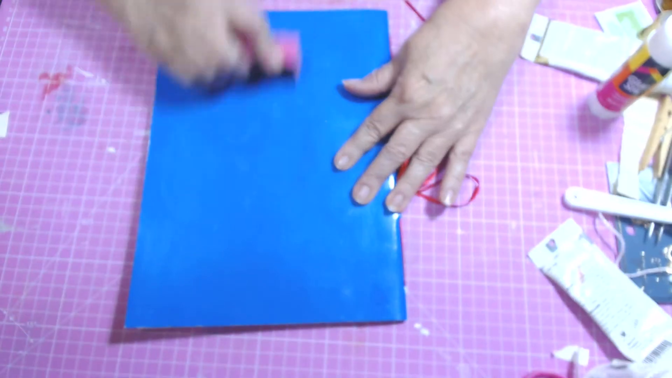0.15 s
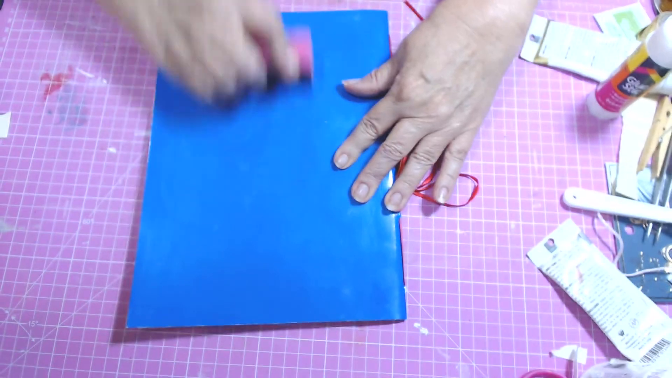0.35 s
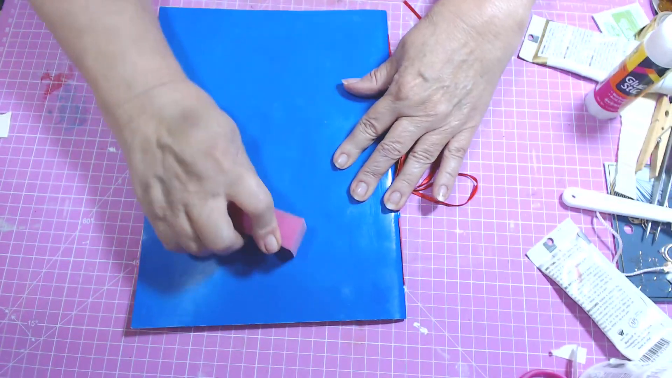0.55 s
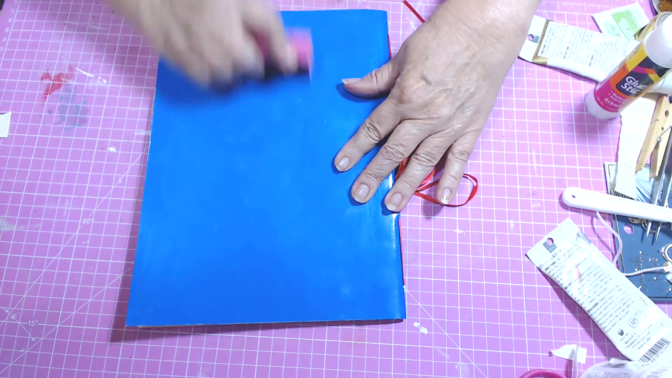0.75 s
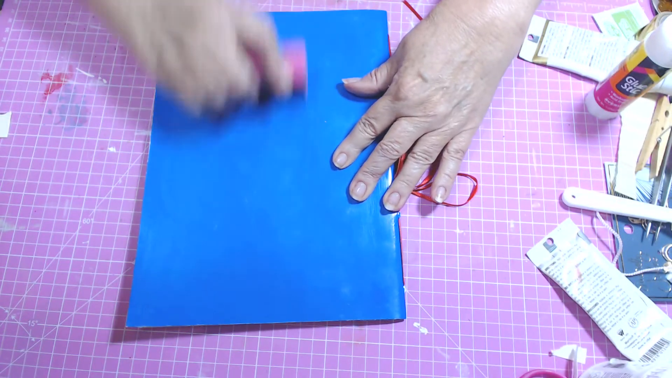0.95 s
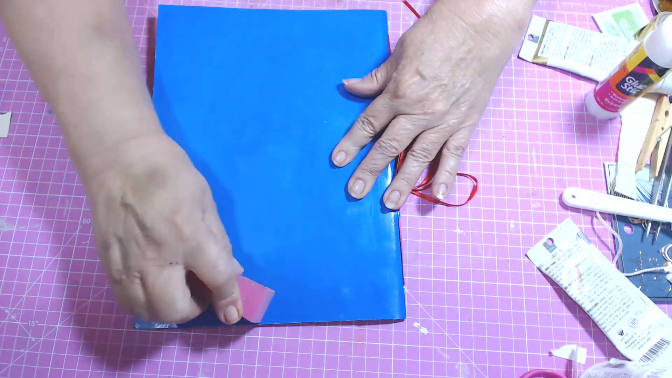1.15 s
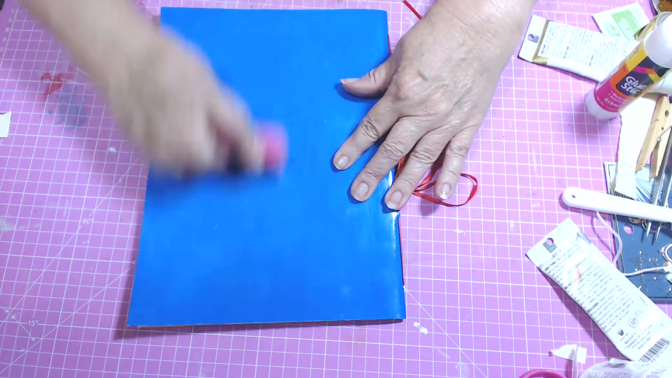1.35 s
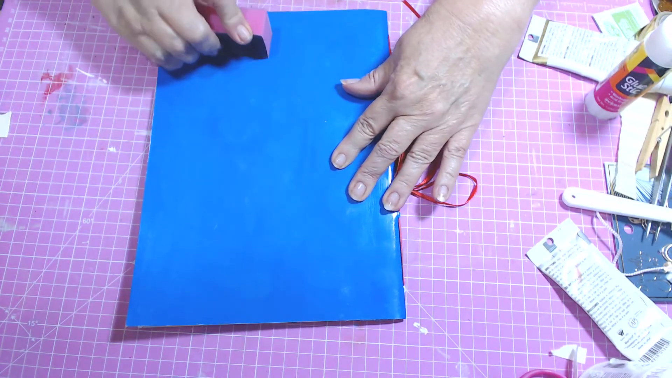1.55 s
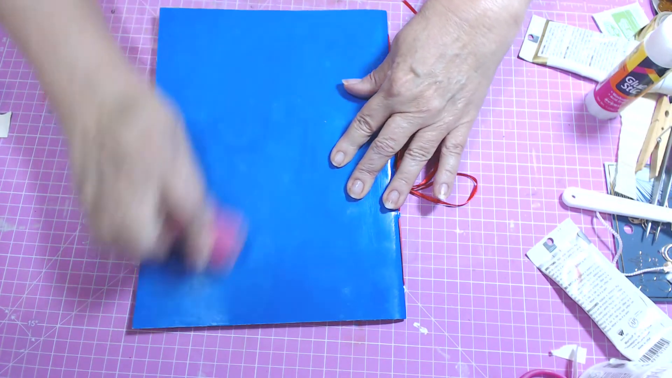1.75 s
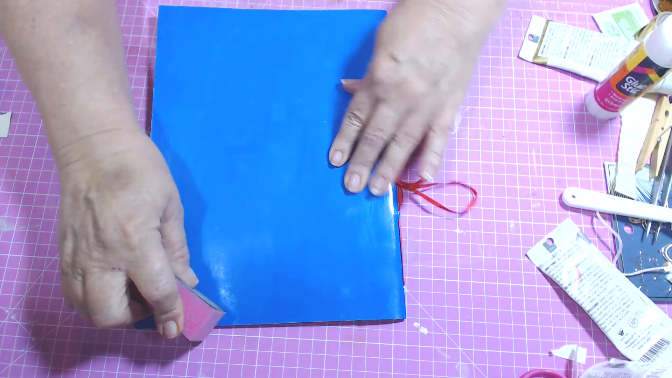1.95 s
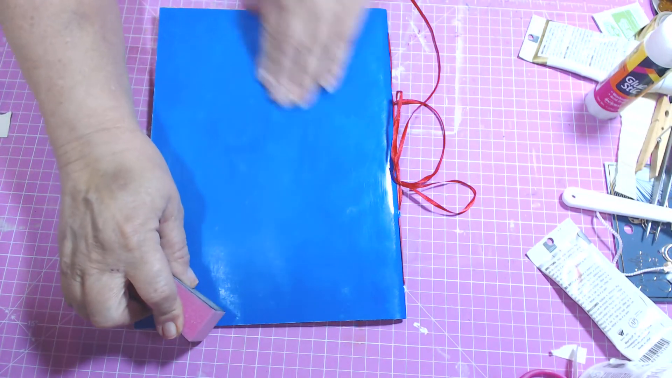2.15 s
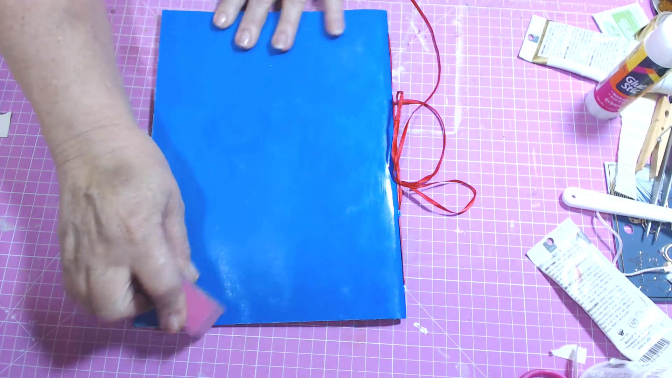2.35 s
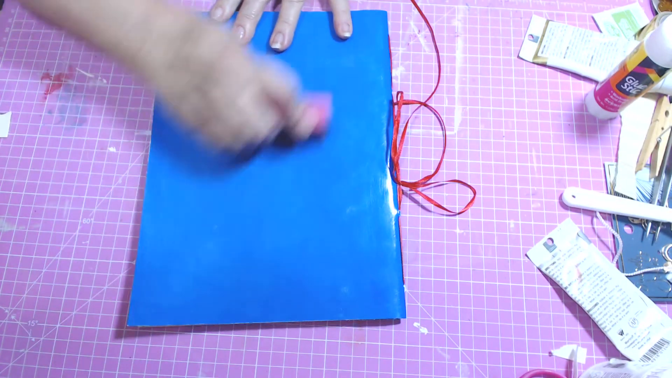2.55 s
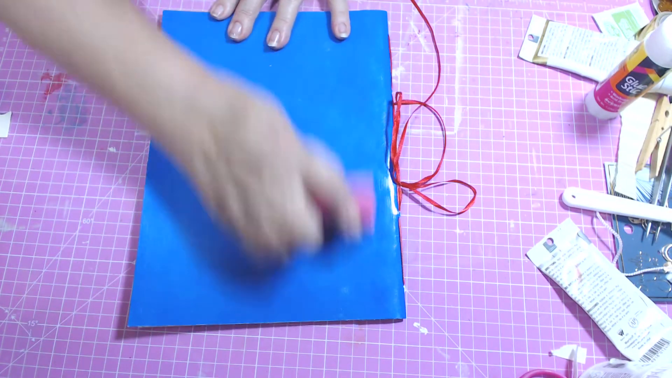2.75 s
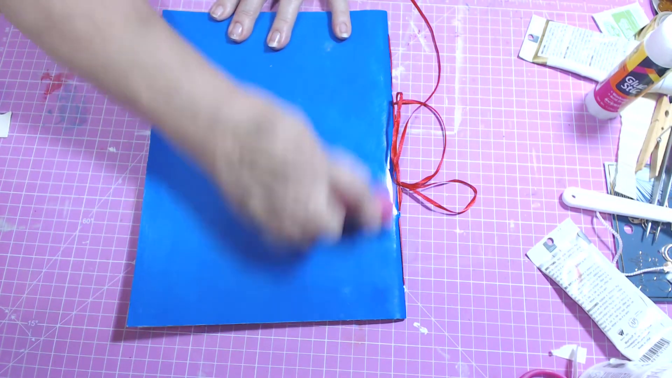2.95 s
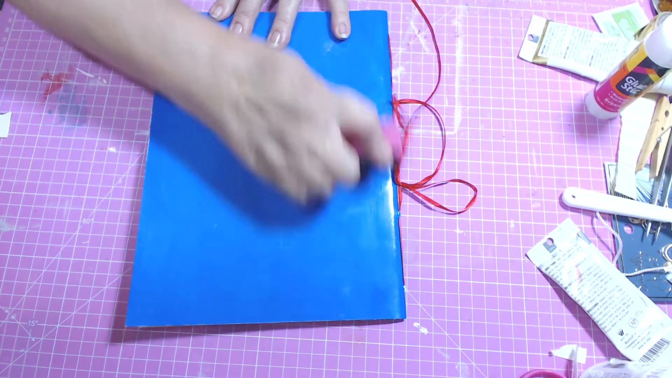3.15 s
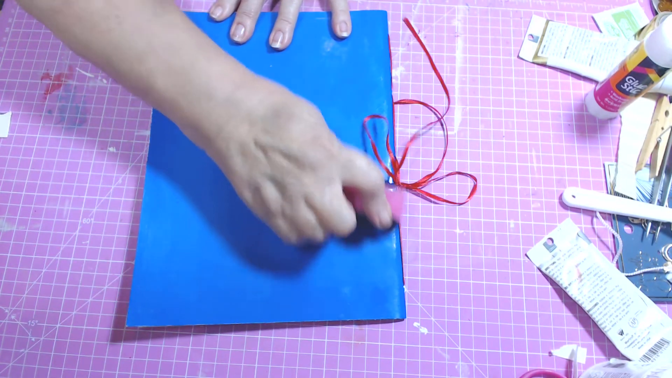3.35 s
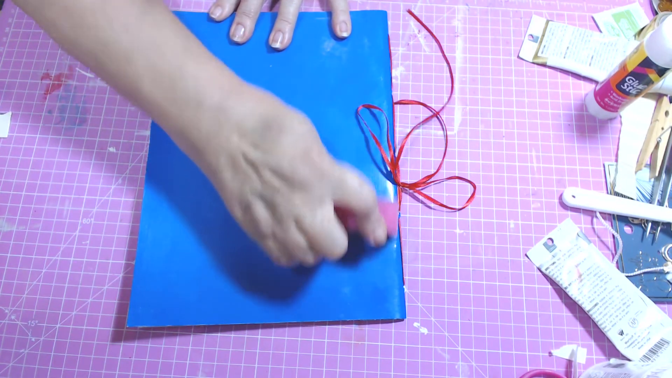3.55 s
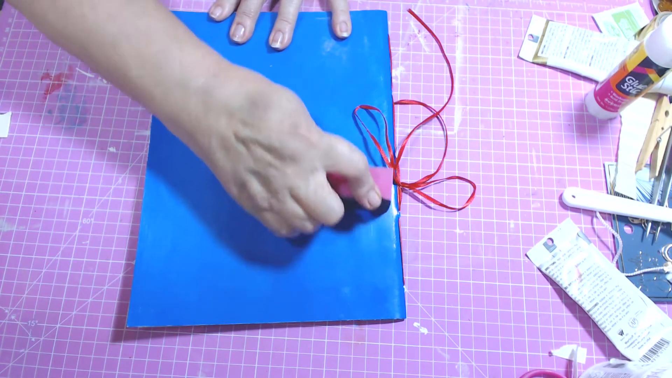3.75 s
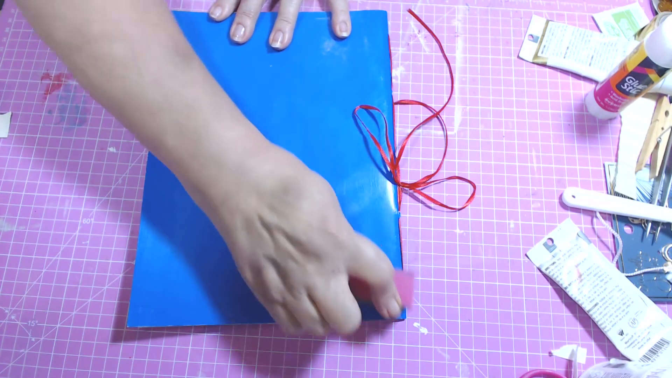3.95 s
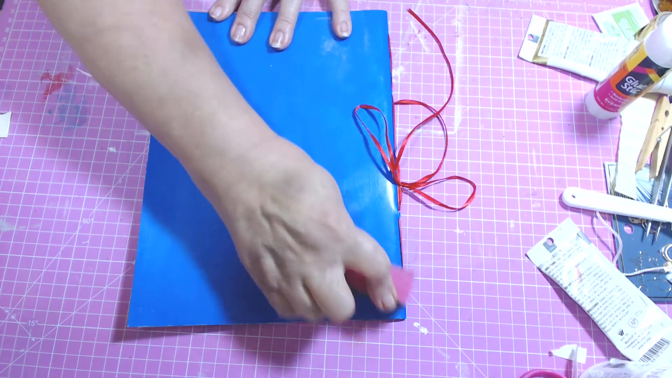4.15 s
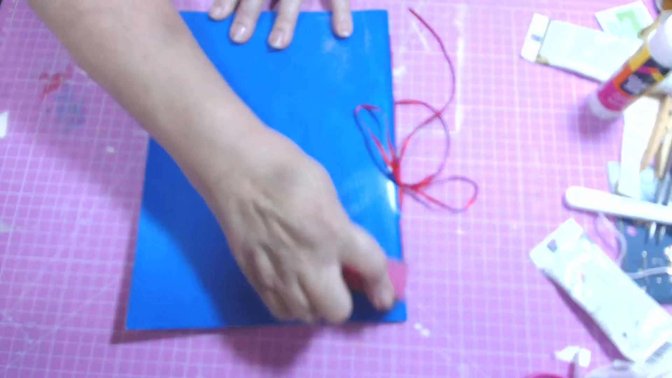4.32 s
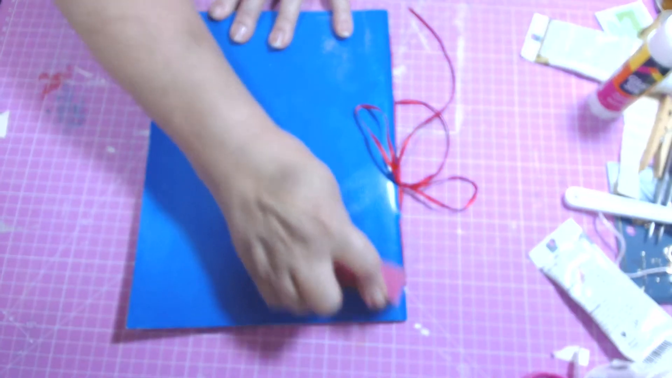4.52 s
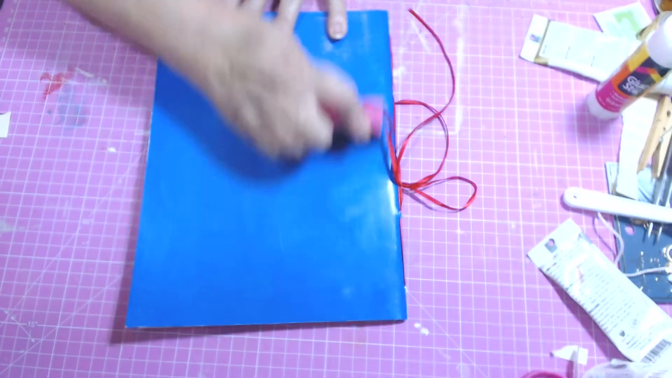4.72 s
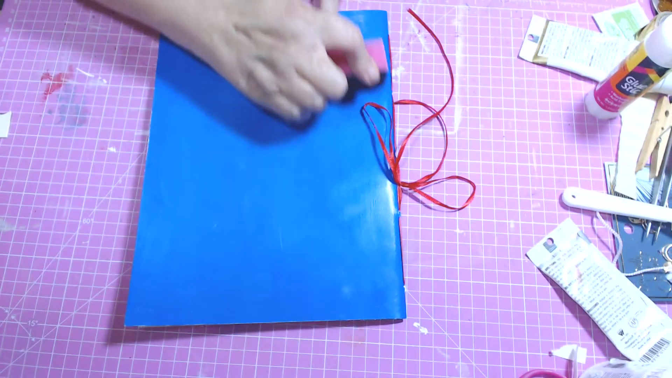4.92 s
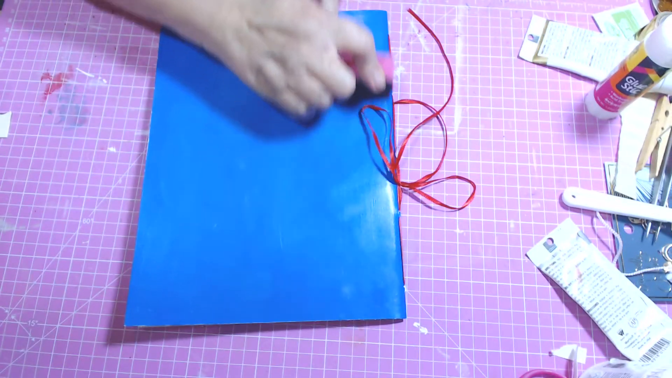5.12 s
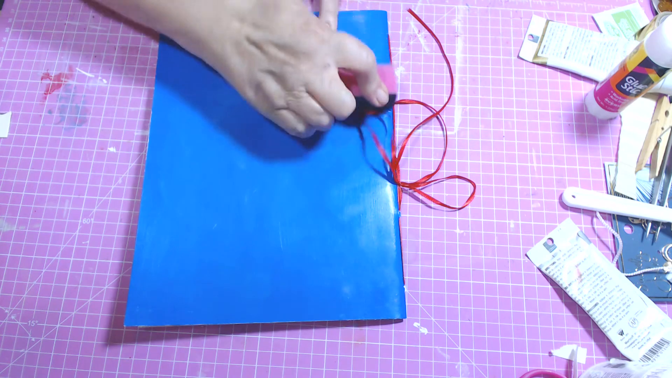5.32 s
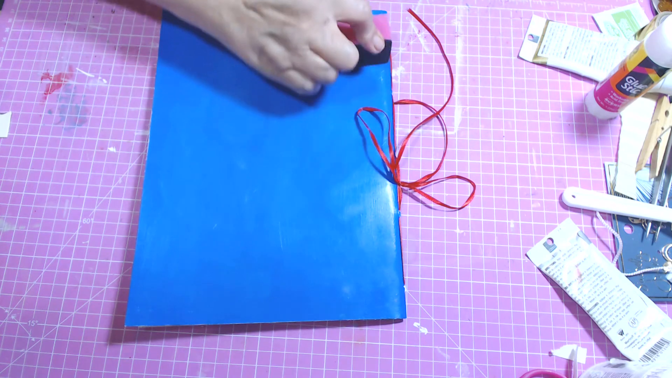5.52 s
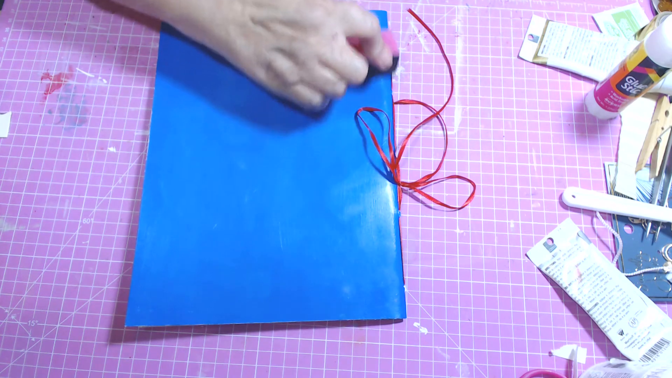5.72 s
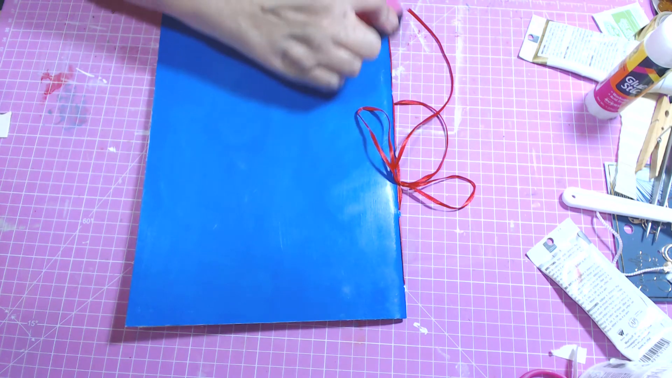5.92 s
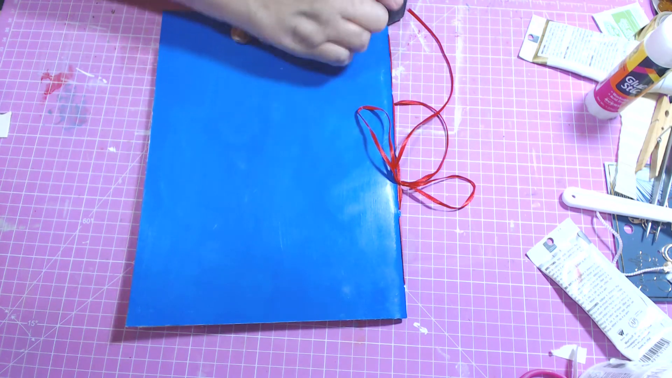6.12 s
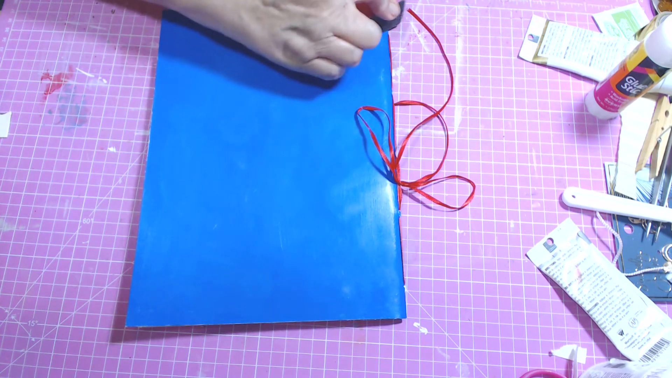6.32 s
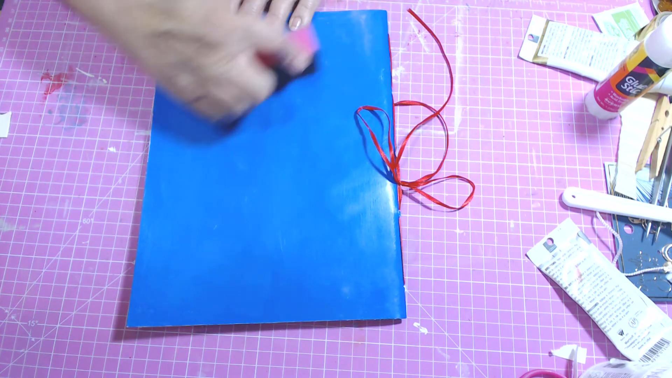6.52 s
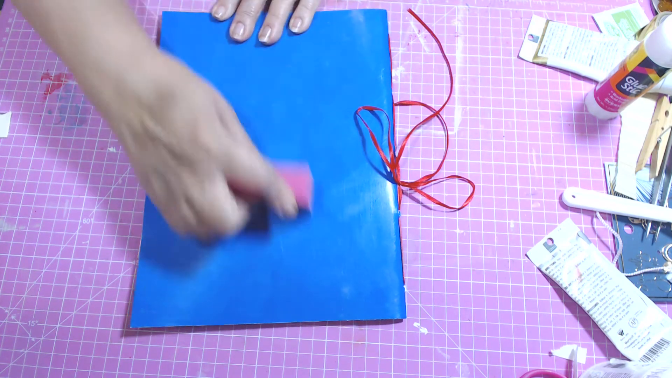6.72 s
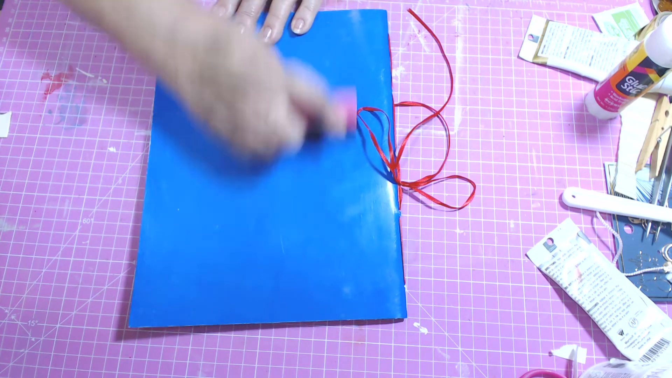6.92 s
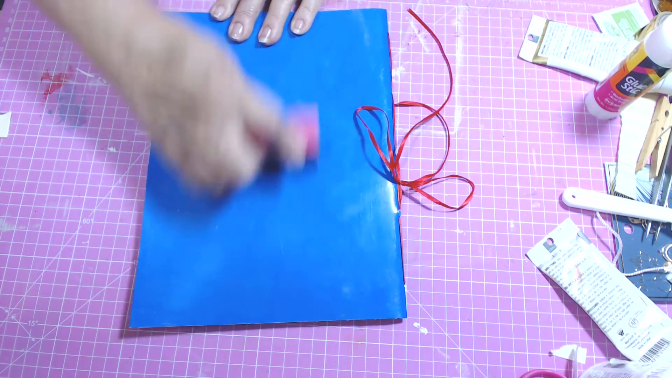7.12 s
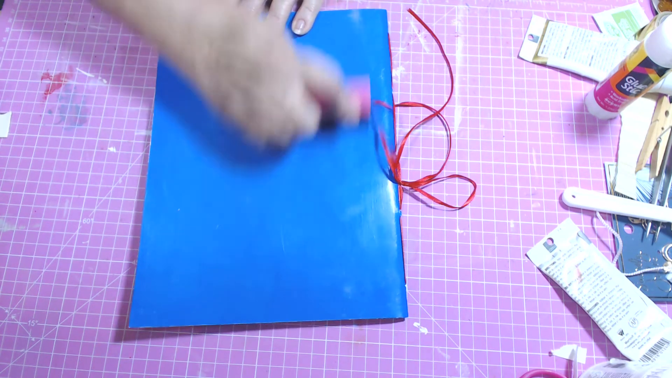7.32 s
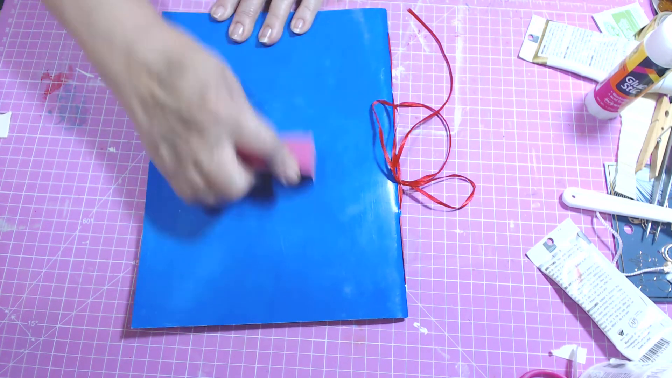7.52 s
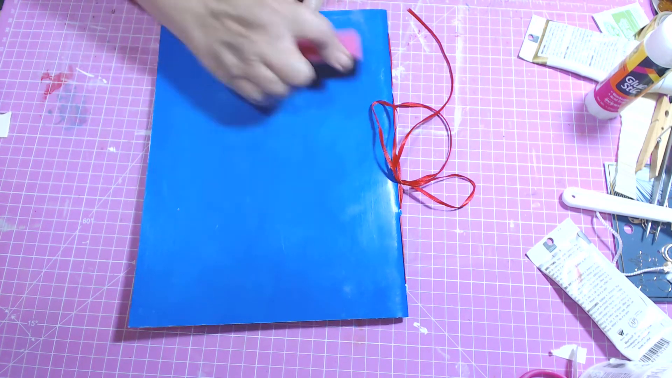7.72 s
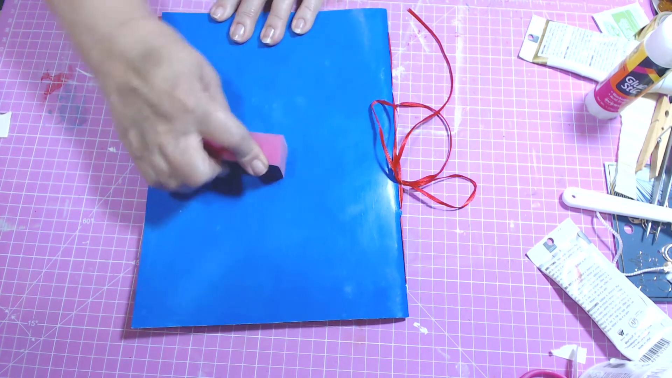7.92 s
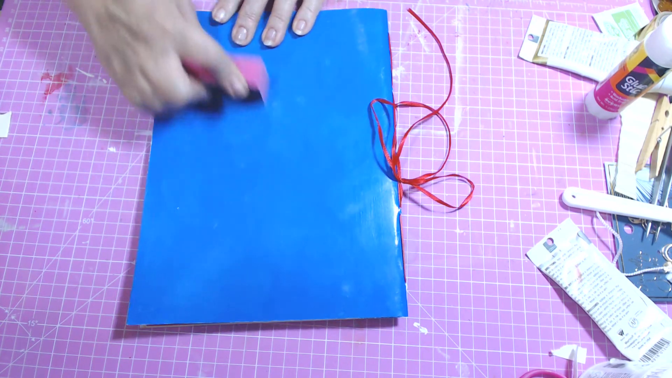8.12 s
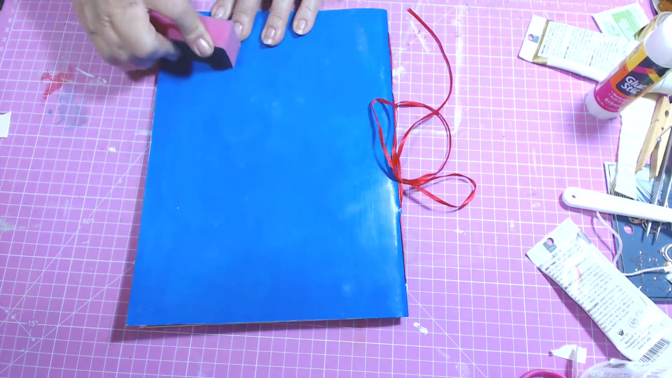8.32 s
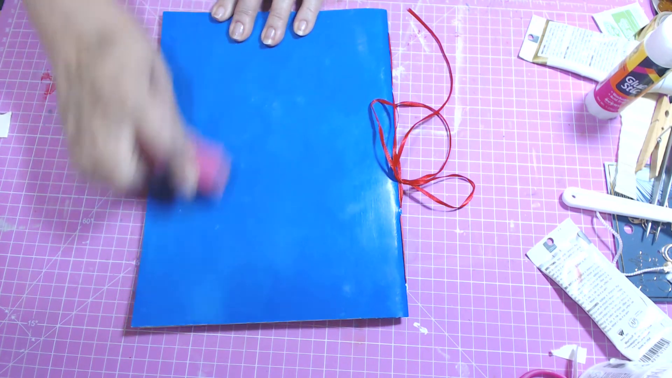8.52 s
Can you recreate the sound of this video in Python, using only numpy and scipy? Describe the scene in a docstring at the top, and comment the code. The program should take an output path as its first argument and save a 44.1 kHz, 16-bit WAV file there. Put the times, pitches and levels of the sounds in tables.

```python
"""A craft table in a small, quietly humming room, with one microphone close to the work.
A coarse nail file block is rubbed back and forth over a plastic cover lying on the table. Its grit
catches and slips on the sheet: bright long strokes on the flat, shorter hollow ones along the rim.
The block bumps the cover at some turns, and a hand shifts its hold in a pause."""
import sys
import numpy as np
from scipy import signal
from scipy.fft import rfft, irfft, next_fast_len
from scipy.io import wavfile
from scipy.ndimage import map_coordinates

SR = 44100
rng = np.random.default_rng(int(sys.argv[2]) if len(sys.argv) > 2 else 0)


def generate_wav(signal):
    """Clip the signal to [-1, 1] and save it as 16-bit WAV at the path in sys.argv[1]."""
    frames = np.transpose(np.atleast_2d(signal))
    scaled = np.clip(frames, -1, 1) * 32767
    pcm = np.round(scaled).astype(np.int16)
    wavfile.write(sys.argv[1], SR, pcm)


N = 382347
TIME = np.arange(N) / SR


def amp(db):
    """Decibels to gain."""
    return 10 ** (np.asarray(db) / 20)


def unit(x):
    """Scale to rms 1."""
    return x / np.sqrt(np.mean(x ** 2) + 1e-20)


def along(points, hz):
    """(f/Hz, value) points read on a log axis."""
    f, v = np.transpose(points)
    return np.interp(np.log(hz + 1), np.log(f + 1), v)


def curve(points):
    """(t/s, value) points read at every sample."""
    return np.interp(TIME, *np.transpose(points))


def wobble(rate):
    """A smooth random curve of rms 1, rate knots a second."""
    knots = rng.standard_normal(int(N * rate / SR) + 4)
    return unit(map_coordinates(knots, [TIME * rate]))


def filtered(x, response):
    """Shape x by a gain that depends on frequency."""
    size = next_fast_len(len(x) + 4096)
    return irfft(rfft(x, size) * response(np.fft.rfftfreq(size, 1 / SR)), size)[:len(x)]


def noise(spectrum):
    """Coloured noise of rms 1."""
    return unit(filtered(rng.standard_normal(N), lambda hz: amp(along(spectrum, hz))))


def resonant_noise(n, centre_hz, half_width_hz):
    """n samples of noise around one resonance, rms 1."""
    peak = lambda hz: 1 / (1 + ((hz - centre_hz) / half_width_hz) ** 2)
    return unit(filtered(rng.standard_normal(n), peak))


def add(track, start_s, sound):
    """Mix a sound into a track."""
    part = track[round(start_s * SR):][:len(sound)]
    part += sound[:len(part)]


# room tone, all around the microphone: f/Hz, level/dB
ROOM_TONE = [(15, -19.5), (35, -4), (85, -12.5), (125, -6), (165, -14), (210, -15), (300, -27.5),
             (620, -21.5), (1000, -23.5), (2000, -30), (3000, -34), (4500, -34), (7500, -44)]

def background():
    """Low room rumble with the wavering drone of an appliance."""
    drone = resonant_noise(N, centre_hz=125, half_width_hz=9)
    return amp(-59.5) * noise(ROOM_TONE) + amp(-62.5 + 3.2 * wobble(5)) * drone


def room(x, t60_s, wet_db):
    """Short reflections from the table and nearby walls follow the direct sound."""
    t = TIME[:SR // 3]
    tail = rng.standard_normal(len(t)) * amp(-60 * t / t60_s) * (1 - np.exp(-t / 0.0029))
    return x + amp(wet_db) * signal.fftconvolve(x, tail / np.linalg.norm(tail))[:N]


# the tabletop under a moving block: f/Hz, level/dB
TABLE_SPECTRUM = [(20, -18.5), (60, -0.5), (125, 4.5), (170, -7.5), (230, -7), (310, -19.5), (600, -39.5),
                  (1500, -89.5)]
# how hard it shakes at full speed: t/s, level/dB
TABLE_SHAKE = [(1.2, -55.5), (1.6, -61.5), (2.6, -55.5), (3.1, -51.5), (3.9, -58.5), (5.2, -58),
               (6.5, -65.5), (7, -55), (8.2, -65.5), (8.6, -56)]

def table_rumble(speed):
    """The dragging block shakes the table in uneven swells."""
    return noise(TABLE_SPECTRUM) * speed * amp(curve(TABLE_SHAKE) + 3.3 * wobble(12))


# fingertips landing on the sheet: t/s, level/dB
FINGER_TAPS = [(1.888, -45), (1.892, -44), (1.937, -38), (1.989, -41), (2.031, -40), (2.042, -42)]
# colour of one tap: f/Hz, level/dB
TAP_SPECTRUM = [(200, -15), (700, -7), (1200, 4), (1700, -1), (2300, -9), (4200, -14), (8000, -11),
                (9000, -55)]
# the hand sliding over the cover: t/s, level/dB
HAND_SLIDE = [(1.8, -92), (1.9, -76), (1.96, -64), (2.03, -57.5), (2.09, -64), (2.12, -62), (2.16, -75.5),
              (2.25, -73), (2.32, -84)]
# skin on plastic: f/Hz, level/dB
SKIN_SPECTRUM = [(300, -10), (1200, 4.5), (2000, -8.5), (3000, 2.5), (4300, -5), (6000, 0.5), (8000, -4.5),
                 (9000, -62)]

def hand():
    """Fingertips tick on the plastic and skin brushes over it."""
    ticks, t = np.zeros(N), TIME[:SR // 20]
    for start, db in FINGER_TAPS:
        burst = rng.standard_normal(len(t)) * amp(-60 * t / 0.013)
        tick = filtered(np.pad(burst, (SR // 1000, 0)), lambda hz: amp(along(TAP_SPECTRUM, hz)))
        add(ticks, start - 1 / 1000, amp(db) * tick / np.abs(tick).max())
    brush = noise(SKIN_SPECTRUM) * amp(curve(HAND_SLIDE) + 0.83 * wobble(110))
    return ticks + brush


# knocks through the tabletop: t/s, thud level/dB, thud f/Hz, flap level/dB re thud, flap f/Hz
COVER_BUMPS = [(.49, -43, 82, -9, 395), (.541, -36, 124, -18, 398), (1.124, -44.5, 70, -7, 390),
               (1.882, -41, 106, -26, 300), (2.28, -35.5, 96, -10.5, 430), (2.818, -30.5, 96, -14, 307),
               (3.031, -29, 80, -17, 580), (3.056, -33.5, 101, -9.5, 603), (3.098, -27, 85, -16, 600),
               (3.279, -46, 120, -5, 215), (3.573, -45, 120, -0.5, 205), (3.716, -38, 75, -14, 209),
               (6.935, -42, 140, -6, 180), (7.877, -41, 109, -3, 170), (7.894, -29, 101, -19.5, 212),
               (7.925, -40, 125, -10, 200)]

def bumps(thud_t60_s=0.085, flap_t60_s=0.2):
    """The block bumps the cover onto the table: a soft, damped thud and a dull flap of the sheet."""
    out, t = np.zeros(N), TIME[:SR // 3]
    attack = 1 - np.exp(-t / 0.0047)
    for start, db, thud_hz, flap_db, flap_hz in COVER_BUMPS:
        thud = np.sin(2 * np.pi * thud_hz * t) * amp(-60 * t / thud_t60_s)
        flap = resonant_noise(len(t), flap_hz, half_width_hz=80) * amp(flap_db - 60 * t / flap_t60_s)
        add(out, start, amp(db) * attack * (thud + flap))
    return out


# Passes of the block. The loose span of sheet under it sings, higher as it travels in from the edge.
# start t/s, end t/s, speeding up t/s, slowing down t/s, jerk/0-1, scrape level/dB, swell/dB,
# body level/dB re scrape, hiss level/dB re scrape, span from f/Hz, span to f/Hz, span lift/dB
BLOCK_STROKES = [(-0.101, 0.136, 0.06, 0.018, 0.35, -46.5, -2, -6.5, 0.5, 3540.0, 1720.0, 2.5),
                 (0.171, 0.467, 0.085, 0.05, 0.6, -45, -2.5, -5.5, -2.5, 1810, 3500, 2.5),
                 (0.481, 0.744, 0.049, 0.029, 0.55, -45.5, -1, -7.0, -1, 3460.0, 2000.0, 3),
                 (0.772, 1.092, 0.065, 0.055, 0.52, -46, -4.0, -6, -2, 1910, 3350, 2.5),
                 (1.125, 1.438, 0.12, 0.032, 0.64, -46, -3, -7, -1, 3210.0, 1930, 3.5),
                 (1.464, 1.832, 0.17, 0.14, 0.58, -47.5, -6.5, -5, -0.5, 2020, 3400, 1),
                 (2.262, 2.53, 0.071, 0.041, 0.4, -49, 1.5, -7.0, -1, 4170.0, 3640.0, 2),
                 (2.515, 2.778, 0.13, 0.019, 0.39, -43.0, -7.5, -6.5, -6.0, 3150, 2900.0, 4),
                 (2.802, 2.98, 0.022, 0.019, 0.5, -47.5, -2, -6, -3.0, 3670.0, 2760.0, 3),
                 (2.989, 3.197, 0.081, 0.051, 0.6, -47.5, -1.5, -1.5, -2, 2250, 2600, 3.0),
                 (3.207, 3.364, 0.065, 0.031, 0.3, -50.5, -7, -2, -3, 2750.0, 3070.0, 1),
                 (3.362, 3.518, 0.055, 0.055, 0.9, -50.5, 7.5, -2, -3.0, 2650, 2400, 5),
                 (3.52, 3.662, 0.075, 0.034, 0.2, -45, -3, -7.5, -5.5, 3250, 2950.0, 5.5),
                 (3.674, 3.961, 0.083, 0.13, 0.6, -47.5, 3, -3.5, -2.5, 2820, 1910, 6.5),
                 (4.001, 4.165, 0.088, 0.045, 0.57, -47, 4, -5.5, -7.5, 1720.0, 2450, -0.5),
                 (4.177, 4.338, 0.096, 0.044, 0.78, -50.5, 4.0, -3, -4, 2400.0, 1720.0, 3.5),
                 (4.374, 4.747, 0.053, 0.024, 0.6, -47.0, -1.0, -5, -4, 3090.0, 3540.0, -0.5),
                 (4.771, 4.933, 0.094, 0.029, 0.4, -45.5, -3.5, -2.5, -8, 2890.0, 2470, 5.5),
                 (4.948, 5.094, 0.071, 0.041, 0.46, -51, 7, 3.5, -3, 3010.0, 2930, 3.5),
                 (5.098, 5.248, 0.082, 0.026, 0.3, -51.0, -2, 1.5, -3.5, 2630, 2210.0, 4),
                 (5.251, 5.424, 0.094, 0.029, 0.0, -53.0, 3.0, 4.5, -2, 2750.0, 3220, -0.5),
                 (5.432, 5.579, 0.094, 0.052, 0.69, -53, 14, -0.5, -4, 2180.0, 2090.0, 2),
                 (5.609, 5.74, 0.037, 0.025, 0.0, -52.5, 0.5, 1, -2.5, 2540.0, 2660, 5.0),
                 (5.765, 5.897, 0.07, 0.027, 0, -50.5, -3, 0.5, -6, 3130.0, 2690.0, 4.5),
                 (5.93, 6.03, 0.056, 0.015, 0.3, -48.5, 0.5, -2.5, -4.5, 2540, 2600, 4),
                 (6.055, 6.189, 0.08, 0.04, 0.5, -57, 1.5, 3, -14.5, 2490.0, 2530, 7),
                 (6.205, 7.878, 0.087, 0.12, 0.3, -47, 2.5, -6.5, -3, 2340, 2550, 2.5),
                 (7.853, 8.196, 0.06, 0.11, 0.05, -45, 1.5, -7.5, -3.5, 4000, 1850, 1.5),
                 (8.205, 8.634, 0.12, 0.036, 0.05, -49.0, -8.5, -3.5, -4.5, 2490, 3900.0, -0.5)]
# one long pass circles without stopping: t/s, extra pressure level/dB, span shift/octaves
BLOCK_LOOPS = [(6.2, 2, .1), (6.35, -3, 0.083), (6.5, -0.5, -0.36), (6.62, 1, 0.21), (6.78, 0.5, .5),
               (6.89, 3, 0.17), (6.97, 0, -1.13), (7.06, 2, 0.27), (7.16, 0, .65), (7.27, 1.5, 0.24),
               (7.35, -.5, -0.65), (7.45, 0, 0.19), (7.56, 1.5, .85), (7.69, 0, -0.15), (7.85, -1.5, -0.51)]

def block_motion(jerk_s=0.007):
    """The block jerks free, glides and slows. Per stroke: samples, speed/0-1, level/dB, span f/Hz."""
    ease = lambda u: np.sin(np.pi / 2 * np.clip(u, 0, 1))
    loop_s, loop_db, loop_octaves = np.transpose(BLOCK_LOOPS)
    strokes = []
    for start, end, rise, fall, jerk, db, swell_db, _, _, from_hz, to_hz, _ in BLOCK_STROKES:
        on = slice(*np.searchsorted(TIME, [start, end]))
        t = TIME[on] - start
        travel = t / (end - start)
        breakaway = jerk * ease(t / jerk_s) + (1 - jerk) * ease(t / rise)
        speed = breakaway * ease((end - TIME[on]) / fall)
        press_db = db + swell_db * (travel - 0.5) + np.interp(TIME[on], loop_s, loop_db, 0, 0)
        span_hz = from_hz * (to_hz / from_hz) ** (ease(travel) ** 2)
        span_hz *= 2 ** np.interp(TIME[on], loop_s, loop_octaves, 0, 0)
        strokes.append((on, speed, press_db, span_hz))
    return strokes


def block_speed(strokes):
    """The block's speed, 0-1, through the whole scene."""
    speeds = np.zeros(N)
    for on, speed, _, _ in strokes:
        speeds[on] = np.maximum(speeds[on], speed)
    return speeds


def grit_catches(speed, snaps_per_s, coarse_db, chatter_db, chatter_rate):
    """Fine grains hiss; coarse ones snap free more often at speed; the block chatters unevenly."""
    snaps = (rng.random(N) < snaps_per_s * speed / SR) * rng.standard_normal(N)
    grains = rng.standard_normal(N) + amp(coarse_db) * unit(snaps)
    return grains * amp(chatter_db * wobble(chatter_rate))


SLACK_HZ = 2170  # a span that sings below this lies slack, near the edge

def slackness(span_hz):
    """0 where the sheet lies taut, 1 where it is loose."""
    return 1 / (1 + (span_hz / SLACK_HZ) ** 8)


def singing_span(grit, strokes, pull_db=2, waver_octaves=0.028, ring_db=4.5, ring_hz=1220):
    """The gliding span and the slack sheet's hollow ring gather the grit's energy around them."""
    hz, t, spectra = signal.stft(grit, SR, nperseg=512)
    span, sing_db = np.full(N, float(SLACK_HZ)), np.zeros(N)
    for (*_, lift_db), (on, _, _, span_hz) in zip(BLOCK_STROKES, strokes):
        span[on], sing_db[on] = span_hz, lift_db
    span, sing_db = np.interp(t, TIME, span), np.interp(t, TIME, sing_db)

    def bell(centre_hz, relative_width=0.13):
        """A peak of height 1 with a shallow dip on either side."""
        away = (hz[:, None] - centre_hz) / (relative_width * centre_hz)
        return 1.55 / (1 + away ** 2) - 0.55 / (1 + (away / 4) ** 2)

    pull = np.tanh(np.gradient(np.log2(span), t))  # sings more pulled inwards, less pushed out
    waver = 2 ** (waver_octaves * np.interp(t, TIME, wobble(35)))  # the block rocks
    span_db = (sing_db + pull_db * pull) * bell(span * waver)
    hollow_db = ring_db * slackness(span) * bell(ring_hz)
    return signal.istft(spectra * amp(span_db + hollow_db), SR, nperseg=512)[1][:N]


# grit on plastic, heard close: f/Hz, level/dB
GRIT_SPECTRUM = [(150, -21), (300, -15.5), (420, -8.5), (800, -4.5), (1200, -6), (2000, -2), (3100, 0),
                 (4000, -3), (5500, -7.5), (7500, -11.5), (8400, -17), (9000, -63)]
# the cover's resonances on the flat, at the near rim and at the far rim: f/Hz, width/Hz, level/dB
FLAT_MODES = [(425, 80, 5), (630, 90, 3.5), (1245, 170, 7.5), (1530, 130, 3), (1920, 190, 5.5),
              (2400, 150, 3), (2980, 220, 2.5), (3320, 160, 2.5), (3760, 120, 2), (4500, 350, 1.5),
              (6520, 200, 2)]
NEAR_RIM_MODES = [(390, 100, 7), (640, 90, 2), (830, 80, 3), (960, 150, 8), (1320, 160, 4.5),
                  (1640, 220, 5), (1920, 160, 4), (2430, 200, 5), (2900, 260, 3), (3320, 120, 3),
                  (4220, 140, 3)]
FAR_RIM_MODES = [(420, 80, 4), (605, 120, 6), (1150, 160, 7), (1350, 200, 5), (1580, 130, 3.5),
                 (1900, 170, 4), (2400, 200, 3), (2880, 220, 6), (4310, 200, 4)]
# dips where nearby reflections cancel at the microphone: f/Hz, width/Hz, level/dB
REFLECTION_DIPS = [(510, 70, -2), (840, 140, -2.5), (1390, 70, -3.5), (1730, 120, -2.5), (2620, 110, -2),
                   (3950, 130, -3.5)]

def cover_response(start_s, detune=0.008):
    """The sheet colours a stroke by place; each new grip shifts its resonances a little."""
    modes = FLAT_MODES
    if 3.6 < start_s < 4.3:
        modes = NEAR_RIM_MODES
    elif 4.7 < start_s < 6.1:
        modes = FAR_RIM_MODES
    shifted = [(f * (1 + detune * rng.standard_normal()), width, db) for f, width, db in modes]
    bands = shifted + REFLECTION_DIPS
    lift_db = lambda hz: sum(db / (1 + (2 * (hz - f) / width) ** 2) for f, width, db in bands)
    return lambda hz: amp(along(GRIT_SPECTRUM, hz) + lift_db(hz))


def sanding(strokes, slack_body_db=5.5, slack_hiss_db=-2.5):
    """Grit drives the sheet, which sounds fuller and duller where it is slack."""
    grit = grit_catches(block_speed(strokes), snaps_per_s=2500, coarse_db=-10,
                        chatter_db=0.82, chatter_rate=320)
    grit = singing_span(grit, strokes)
    low = lambda hz: 1 / (1 + (hz / 1800) ** 10)
    high = lambda hz: 1 - 1 / (1 + (hz / 4100) ** 10)
    mid = lambda hz: 1 - low(hz) - high(hz)
    out = np.zeros(N)
    for row, (on, speed, press_db, span_hz) in zip(BLOCK_STROKES, strokes):
        start, *_, body_db, hiss_db, _, _, _ = row
        sheet = filtered(grit[on], cover_response(start))
        body, scrape, hiss = [unit(filtered(sheet, band)) for band in (low, mid, high)]
        slack = slackness(span_hz)
        # the hiss needs more speed than the body, so the turns sound dull
        body *= amp(body_db + slack_body_db * slack) * speed ** 0.88
        hiss *= amp(hiss_db + slack_hiss_db * slack) * speed ** 2.77
        out[on] += amp(press_db) * (body + scrape * speed + hiss)
    return out


def scene():
    """The work up close and the room behind it reach one microphone, alike in both channels."""
    strokes = block_motion()
    close = sanding(strokes) + table_rumble(block_speed(strokes)) + bumps() + hand()
    mono = room(close, t60_s=0.16, wet_db=-15) + background()
    return np.array([mono, mono])


def record(dry):
    """The microphone rolls off towards its band limit and keeps nothing above it."""
    roll_off = [(7400, -1.5), (7750, -9.0), (8150, -23.0)]  # f/Hz, level/dB
    top_hz = 8177
    microphone = lambda hz: amp(along(roll_off, hz)) * (hz < top_hz)
    return np.array([filtered(channel, microphone) for channel in dry])


dry = scene()
out = record(dry)
generate_wav(out)
```